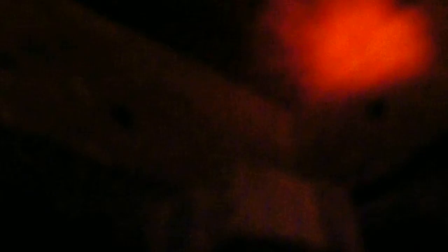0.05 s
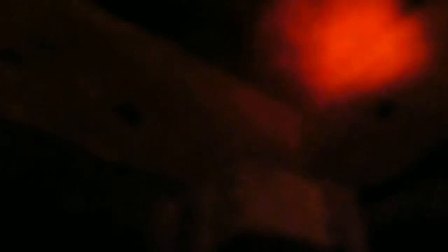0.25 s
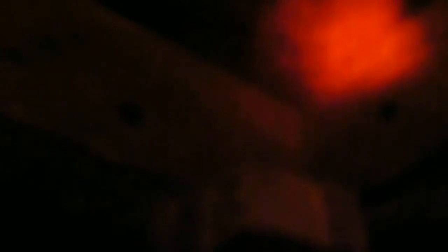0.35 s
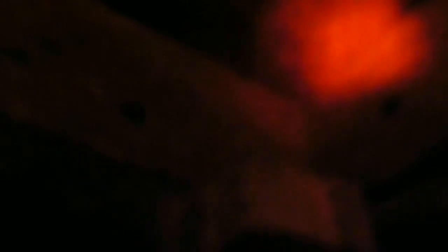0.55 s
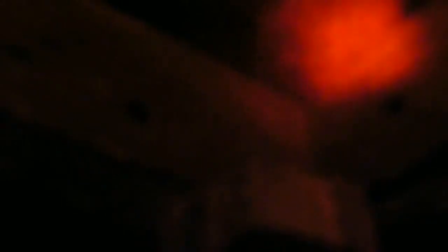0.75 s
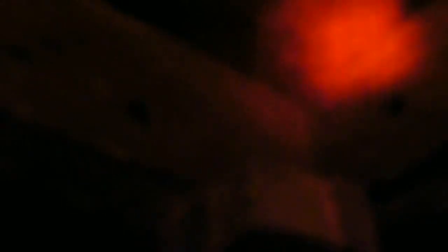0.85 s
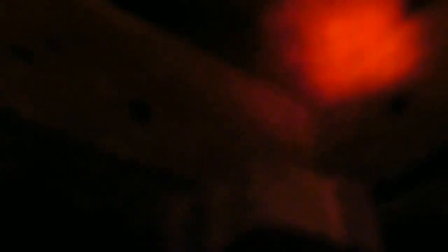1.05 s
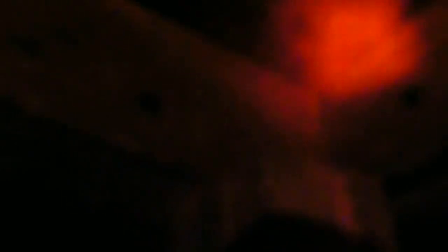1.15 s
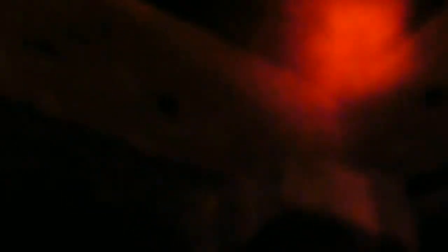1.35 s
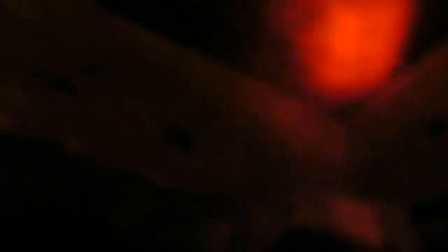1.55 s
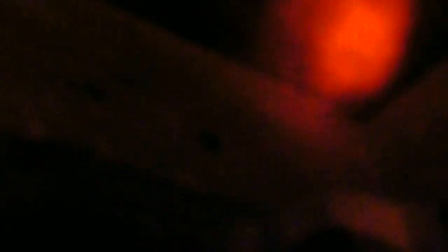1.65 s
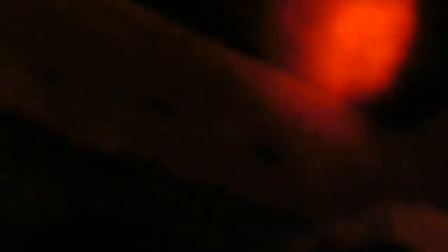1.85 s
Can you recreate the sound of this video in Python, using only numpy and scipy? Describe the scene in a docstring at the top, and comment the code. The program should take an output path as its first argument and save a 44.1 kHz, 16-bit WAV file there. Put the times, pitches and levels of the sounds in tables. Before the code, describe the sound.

Quick dry scratching of small claws inside a wooden wall, over faint hiss.

```python
"""A small animal, by the sound of it, scratches inside a timber wall, about seven strokes a second.
In each stroke the claws drag over the grain, snag and snap free. The board carries the treble faster
than the bass, so each snag is a click followed by a hollow knock. The claws are layered in three bands:
low knock, bright click and airy edge. A quiet room hiss and a faint mains hum lie beneath."""
import sys
import numpy as np
from scipy import signal
from scipy.fft import rfft, irfft
from scipy.io import wavfile
from scipy.ndimage import uniform_filter1d

SR = 44100
rng = np.random.default_rng(int(sys.argv[2]) if len(sys.argv) > 2 else 0)


def to_wav(sig):
    """Store sig (one row per channel, or 1-D mono) as 16-bit WAV at the path in sys.argv[1].

    Samples outside -1..1 are clipped; the rate is SR.
    """
    pcm = np.clip(np.atleast_2d(sig), -1, 1) * 32767
    pcm = np.round(pcm).astype(np.int16)
    wavfile.write(sys.argv[1], SR, pcm.T)  # frames by channels


N = 83790
FFT_SIZE, PULSE_SIZE = 2 ** 17, 2048
HZ = np.maximum(np.fft.rfftfreq(FFT_SIZE, 1 / SR), 1)
T = np.arange(N) / SR
KNOCK, CLICK, EDGE = range(3)
KNOCK_TOP_HZ, EDGE_FROM_HZ, CUTOFF_HZ = 1400, 7720, 16200


def from_db(db):
    """Decibels to gain."""
    return 10 ** (np.asarray(db) / 20)


def unit_rms(x):
    """Scale to an rms of one."""
    return x / np.sqrt(np.mean(x ** 2) + 1e-20)


def curve(hz, values):
    """Join points by straight lines on a log-frequency axis."""
    return np.interp(np.log(HZ), np.log(hz), values)


def causal_eq(points):
    """Minimum-phase EQ through points of frequency in Hz and gain in dB."""
    cepstrum = irfft(np.log(from_db(curve(*np.transpose(points)))))
    cepstrum[1:FFT_SIZE // 2] *= 2
    return np.exp(rfft(cepstrum[:FFT_SIZE // 2], FFT_SIZE))


def board_ring():
    """The board rings at its resonances; returns their summed frequency response."""
    # Each row: pitch in Hz, peak in dB over the direct wave, time to fall 60 dB in seconds.
    modes = [(358.5, 8.5, 0.26), (460, -2.5, 0.14), (540, 9, 0.14), (603.3, 6.5, 0.13), (650.6, 2, 0.42),
             (774.6, 3.5, 0.16), (850, 2.5, 0.039), (917, 4.5, 0.074), (996, 5, 0.04), (1337, 1.5, 0.034),
             (1650, 6, .11), (2237, -11.5, 0.07), (2850, 3, 0.031), (3570, 8, 0.041), (3940, -5, 0.075),
             (4940, -46, 0.18)]
    return sum(from_db(db) / (1 + 1j * np.pi * t60 / np.log(1000) * (HZ ** 2 - hz ** 2) / HZ)
               for hz, db, t60 in modes)


def room_tone():
    """A steady bed of hiss, hollowed by the board's resonances, and mains hum."""
    # The tone of the hiss. Each row: frequency in Hz, relative level in dB.
    hiss_eq = [(25, -14), (60, -18.5), (130, -8), (190, -22), (260, -4), (355, 4), (400, 0), (520, 6),
               (620, -4), (1000, -7), (1200, -7.5), (2300, -10.5), (5000, -15.5), (7000, -19), (8000, -25),
               (10000, -22.5), (16000, -25.5)]
    hiss_db, ring_share, hum_hz, hum_db = -48.5, 0.49, 120, -75
    noise = rfft(rng.standard_normal(FFT_SIZE)) * causal_eq(hiss_eq)
    hiss = irfft(noise * (1 + ring_share * board_ring()))[:N]
    hum = np.sin(2 * np.pi * hum_hz * T)
    return from_db(hiss_db) * unit_rms(hiss) + from_db(hum_db) * unit_rms(hum)


def reverb_tail(bands):
    """Frequency response of dense reflections that die at their own rate in each band."""
    centres_hz, tail = np.array(bands)[:, 0], 0
    for share, (_, db, t60) in zip(np.eye(len(bands)), bands):
        echoes = rng.standard_normal(N) * from_db(-60 * T / t60) * (1 - np.exp(-20 * T / t60))
        band_gain = from_db(db) * np.sqrt(curve(centres_hz, share))
        tail = tail + band_gain * rfft(echoes / np.linalg.norm(echoes), FFT_SIZE)
    return tail


def timber_wall():
    """The wall's knock, click and edge responses: bending waves bring the treble ahead of the bass."""
    # The tone of the path through the wall. Each row: frequency in Hz, gain in dB.
    wall_eq = [(60, -32), (180, -13.5), (290, -7.5), (420, -4.5), (560, -1), (800, -4.5), (1040, -2),
               (1200, -4), (1600, -7.5), (1850, -9.5), (2100, -4), (2450, -7.5), (2620, -12.5), (2900, -9),
               (3200, -11), (3480, -9.5), (3700, -11.5), (3950, -6.5), (4250, -14.5), (4440, -8),
               (4660, -4), (5750, -8.5), (5980, -7), (6250, -4.5), (6550, -13), (6850, -7.5), (7500, -15.5),
               (7850, -28), (8200, -7.5), (9400, -12), (10800, -13.5), (11800, -28), (16000, -27)]
    # Reflections in the wall cavity and in the room.
    # Each row: band centre in Hz, energy in dB against the direct wave, time to fall 60 dB in seconds.
    cavity = [(398, -6.5, 0.046), (1080, -1.5, 0.012), (2780, -3, 0.038), (5840, -2, 0.011),
              (11200, -2, .012)]
    room = [(404, -9, 0.3), (930, -9.5, .18), (2980, -11, 0.094), (5700, -18, 0.14), (11000, -17, 0.051)]
    # Travel time goes as one over the root of frequency; the lag is counted from the cutoff's arrival.
    travel_s, at_hz = 0.0036, 994.4
    lag_cycles = travel_s * (2 * np.sqrt(at_hz * HZ) - HZ * np.sqrt(at_hz / CUTOFF_HZ))
    ringing = board_ring() + reverb_tail(cavity) + reverb_tail(room)
    bending_wave = np.exp(-2j * np.pi * lag_cycles) * (1 + ringing)
    fast_db, fast_from_hz = -4, 2960   # part of the click runs straight through the timber
    fast_wave = from_db(fast_db) / (1 + fast_from_hz / (1j * HZ)) ** 2
    wall = causal_eq(wall_eq) * (bending_wave + fast_wave)
    knock = 1 / (1 + (HZ / KNOCK_TOP_HZ) ** 6)
    edge = 1 - 1 / (1 + (HZ / EDGE_FROM_HZ) ** 16)
    responses = [wall * band for band in (knock, 1 - knock - edge, edge)]
    # Each band is levelled to an rms of one over its loudest millisecond.
    return [part / np.sqrt(uniform_filter1d(irfft(part) ** 2, size=44).max()) for part in responses]


def fibre_slips():
    """Tiny slips of a claw over wood fibres, uneven in time and size and bunched into catches."""
    slips_per_s, spread_db = 2200, 4.5
    catch_db, catch_s = 3.5, 0.003   # the grip varies from one ridge of the grain to the next
    sizes = from_db(spread_db * np.minimum(rng.exponential(1, N), 3)) * rng.choice([-1, 1], N)
    ridges = np.clip(rng.standard_normal(N), -2, 2)
    grip = from_db(catch_db * np.interp(T / catch_s, np.arange(N), ridges))
    slipping = rng.random(N) < slips_per_s / SR
    return unit_rms(grip * sizes * slipping)


def spot_tone(hz, octaves, response):
    """A centred pulse that favours one pitch range without changing the energy that leaves the wall."""
    step = FFT_SIZE // PULSE_SIZE
    bell = np.exp(-0.5 * (np.log2(HZ[::step] / hz) / octaves) ** 2)
    wall_power = abs(response[::step]) ** 2
    return np.fft.fftshift(irfft(bell / np.sqrt(np.average(bell ** 2, weights=wall_power))))


def snag_force(band, slips, response):
    """A claw snags and snaps free in one sharp pulse; above the knock, tearing fibres surround it."""
    # Each spot on the board favours its own pitches. Each row: time in seconds,
    # knock, click and edge levels in dB, knock and click pitches in Hz.
    snags = [(0.2106, -28, -40.5, -56, 710, 1160), (.2375, -40, -41, -49, 690, 4450),
             (.324, -38, -62, -50, 620, 2770), (0.3678, -26.5, -29.5, -36, 830, 4550),
             (.397, -47, -40, -50, 700, 4500), (.480, -34, -41, -39, 760, 3200),
             (.488, -26, -41, -55, 540, 2600), (0.5056, -36, -31.5, -34, 600, 5040),
             (0.51, -38, -27.5, -31, 586, 4600), (.5212, -19.5, -22.5, -30.5, 520, 1870),
             (0.59, -33.5, -51, -62, 710, 4000), (.599, -47, -39, -40, 685, 4800),
             (.607, -33, -38, -39, 686, 4800), (.619, -38, -32, -39, 575, 4440),
             (.624, -19, -24, -33, 450, 3600), (.654, -33, -36.5, -38, 456, 4200),
             (0.768, -35.5, -37.5, -52, 480, 3740), (.803, -46, -27, -38, 527, 3450),
             (0.8165, -19, -21, -28.5, 464, 1580), (.845, -44, -38, -40, 600, 5550),
             (.934, -30, -34, -46, 880, 4800), (.9405, -28, -25, -47, 820, 4930),
             (.9705, -21, -17, -29, 850, 4200), (.973, -22.5, -25, -25, 780, 3380),
             (1.097, -32.5, -34, -48, 710, 3700), (1.1001, -26.5, -30, -36.5, 734, 2760),
             (1.126, -31.5, -34, -34.5, 553, 1530), (1.205, -24, -33, -40, 740, 2290),
             (1.2275, -24, -23.5, -28.5, 746, 4440), (1.238, -20.5, -32, -30, 655, 4230),
             (1.2419, -43, -32, -32, 690, 3900), (1.3094, -28.5, -37, -54, 670, 1520),
             (1.3431, -14, -17, -27, 540, 2390), (1.363, -25, -38, -44, 670, 4200),
             (1.369, -18, -21.5, -26, 764, 3650), (1.4684, -14, -20, -29, 750, 1820),
             (1.481, -25, -30, -38, 680, 4550), (1.4907, -32, -30, -31, 650, 5040),
             (1.496, -22, -52, -50, 485, 2600), (1.5851, -31.5, -43, -52, 714, 3700),
             (1.5926, -29, -37.5, -46, 850, 3650), (1.6055, -26.5, -27, -31, 1120, 5230),
             (1.609, -33, -31.5, -48, 740, 4030), (1.616, -27, -35, -40, 620, 1900)]
    knock_width_octaves, click_width_octaves = 0.55, 1.04
    tear_db, build_s, decay_s = -7, 0.00073, 0.00068
    force, half = np.zeros(N), PULSE_SIZE // 2
    t = np.arange(-half, half) / SR
    tear_envelope = np.exp(np.minimum(t / build_s, -t / decay_s))
    for time_s, *levels_db, knock_hz, click_hz in snags:
        span = slice(int(time_s * SR) - half, int(time_s * SR) + half)
        snap = (t == 0) * 1.0
        if band != KNOCK:
            tear = tear_envelope * slips[span]
            snap = snap + from_db(tear_db) * tear / np.linalg.norm(tear)
        if band != EDGE:
            spot = (knock_hz, knock_width_octaves) if band == KNOCK else (click_hz, click_width_octaves)
            snap = signal.fftconvolve(snap, spot_tone(*spot, response), "same")
        force[span] += from_db(levels_db[band]) * snap
    return force


def drag_rasp(band, slips, response):
    """Spectrum of claws dragging over the grain: the pressure sets in, holds and lets go."""
    # Each row: start in seconds, length in seconds, level in dB, edge lift in dB.
    drags = [(0.237, 0.011, -45, 7), (0.314, 0.032, -52, 9), (0.351, 0.02, -43.5, 2),
             (0.457, .007, -52, 12), (0.476, 0.053, -41.5, -4), (0.594, 0.017, -39.5, -15),
             (.627, 0.0108, -37, 7), (0.65, 0.0086, -41.5, -2), (0.754, 0.023, -50, -2),
             (0.776, 0.049, -42.5, 5.5), (0.839, 0.0043, -51.5, 7), (0.9, 0.0078, -41.5, 15.5),
             (0.91, 0.015, -46, 9), (0.925, 0.018, -39, 7.5), (0.946, 0.018, -34, 4),
             (1.11, 0.022, -40.5, 2), (1.224, 0.0054, -34.5, 6), (1.231, .016, -34, -9),
             (1.338, 0.011, -30.5, -14), (1.358, 0.015, -34, -4), (1.488, 0.013, -35.5, 0),
             (1.596, 0.023, -37, -1)]
    # A light dragging touch is thin and airy. Each row: frequency in Hz, relative gain in dB.
    touch_eq = [(200, -6.5), (700, -1.5), (11000, -2), (13000, 5)]
    knock_trim_db, edge_trim_db, fade_s = 2.5, -15, 0.0046
    pressure = np.zeros(N)
    for start_s, length_s, db, lift_db in drags:
        trim_db = (knock_trim_db, 0, edge_trim_db + lift_db)[band]
        inside_s = np.minimum(T - start_s, start_s + length_s - T)
        pressure += from_db(db + trim_db) * np.clip(inside_s / fade_s + 0.5, 0, 1)
    tone = response * from_db(curve(*np.transpose(touch_eq)))
    return tone / np.linalg.norm(irfft(tone)) * rfft(slips * pressure, FFT_SIZE)


def scratching():
    """Snags and drags drive the wall, band by band."""
    slips, spectrum = fibre_slips(), 0
    for band, response in enumerate(timber_wall()):
        snaps = response * rfft(snag_force(band, slips, response), FFT_SIZE)
        spectrum = spectrum + snaps + drag_rasp(band, slips, response)
    return irfft(spectrum)[:N]


def scene():
    """Scratching over the room tone, in mono."""
    return (scratching() + room_tone())[None]


def record(dry):
    """A steep low-pass takes off the very top."""
    return irfft(rfft(dry, FFT_SIZE) / (1 + (HZ / CUTOFF_HZ) ** 200), FFT_SIZE)[:, :N]


dry = scene()
out = record(dry)
to_wav(out)
```